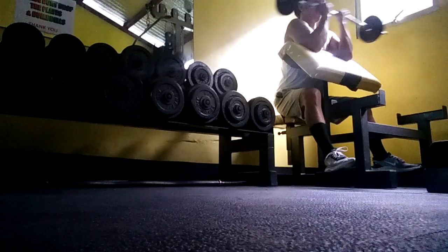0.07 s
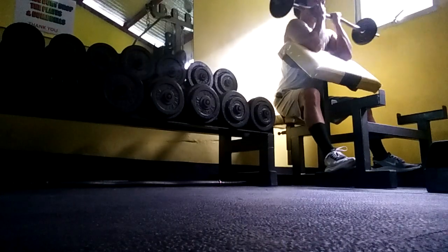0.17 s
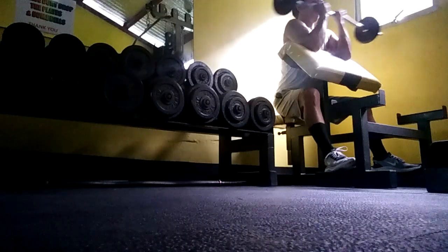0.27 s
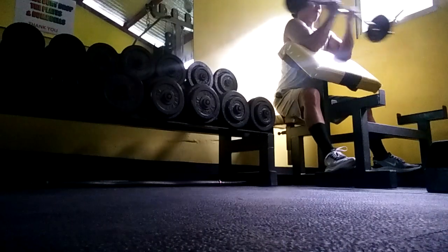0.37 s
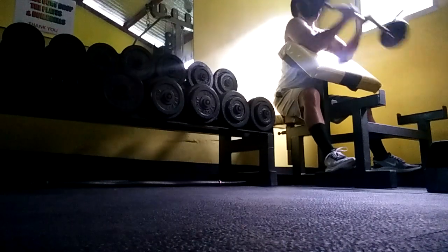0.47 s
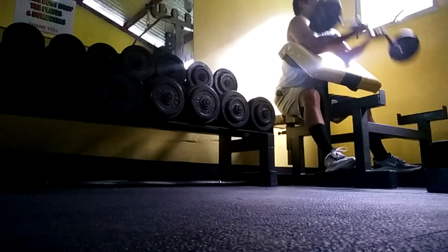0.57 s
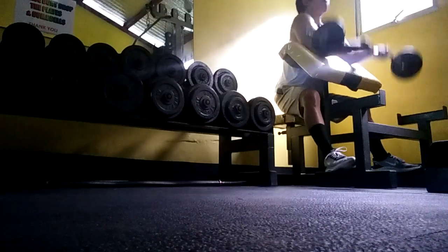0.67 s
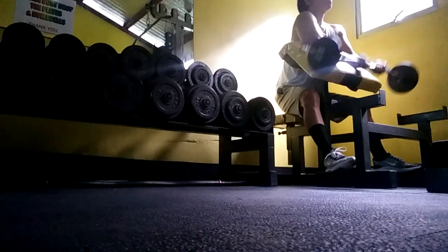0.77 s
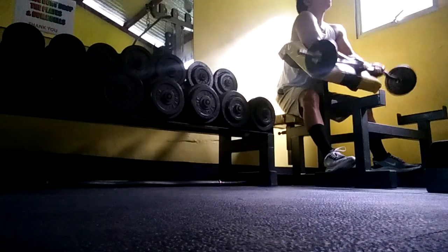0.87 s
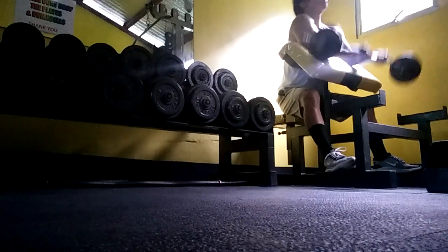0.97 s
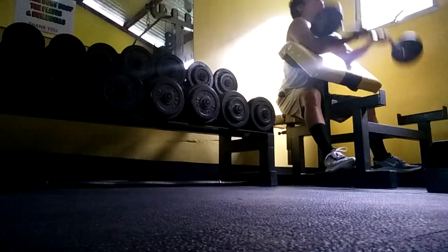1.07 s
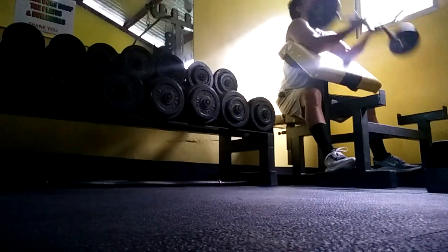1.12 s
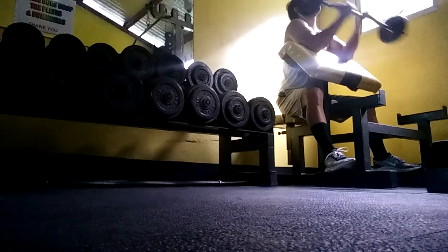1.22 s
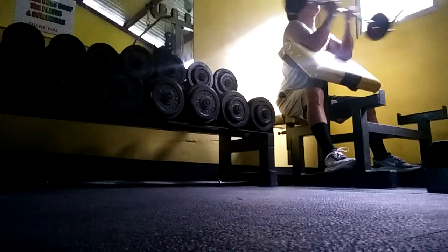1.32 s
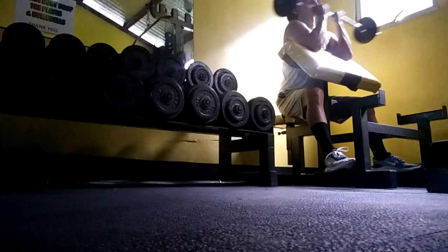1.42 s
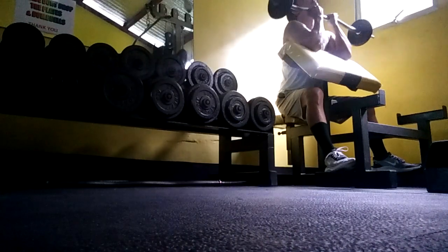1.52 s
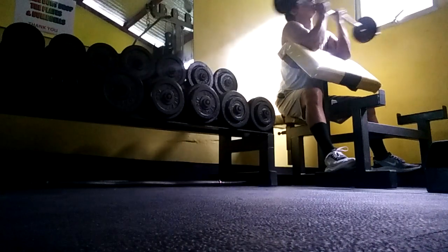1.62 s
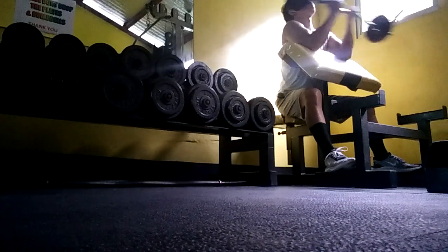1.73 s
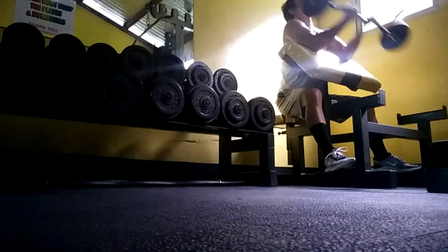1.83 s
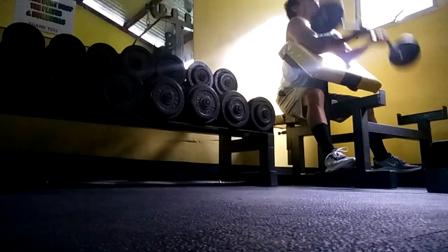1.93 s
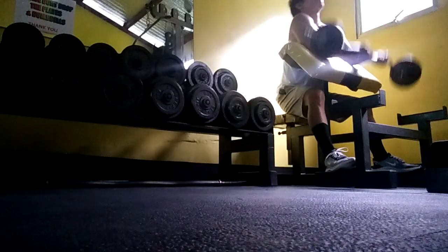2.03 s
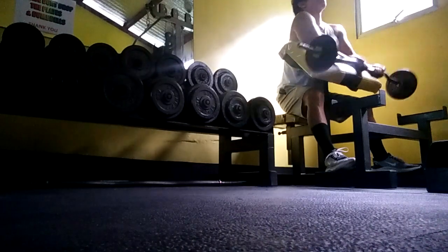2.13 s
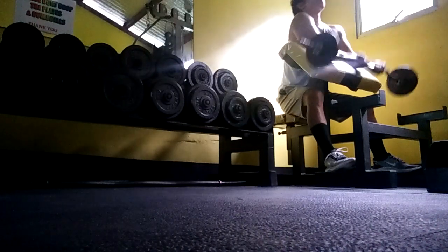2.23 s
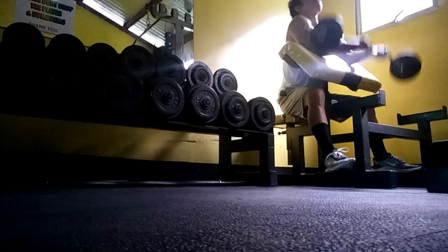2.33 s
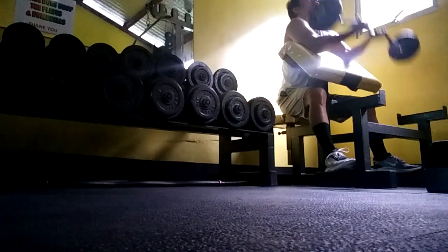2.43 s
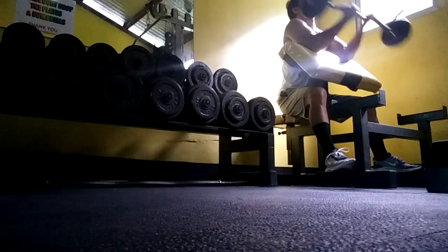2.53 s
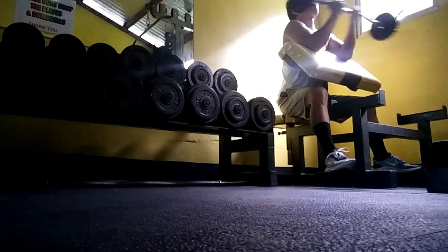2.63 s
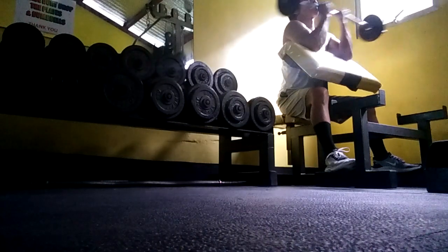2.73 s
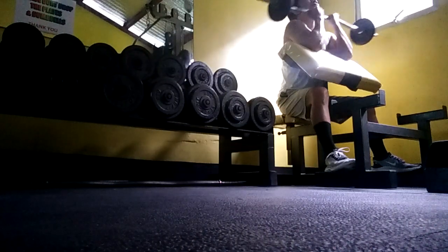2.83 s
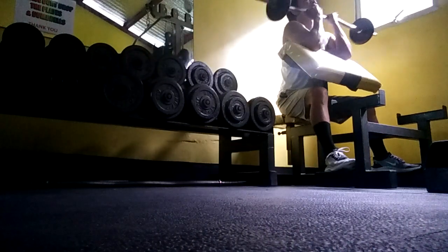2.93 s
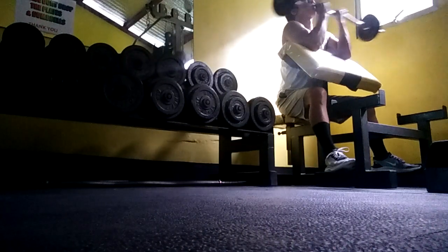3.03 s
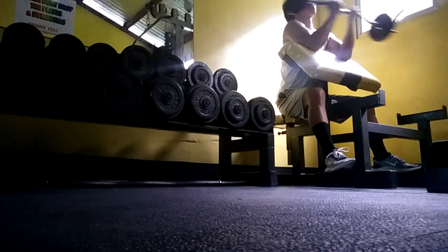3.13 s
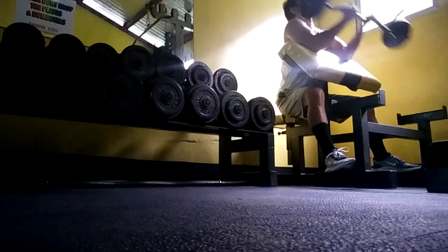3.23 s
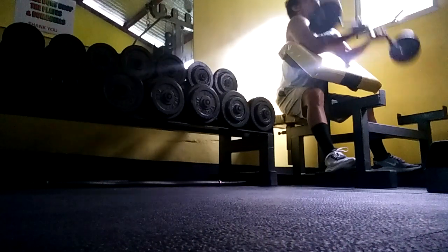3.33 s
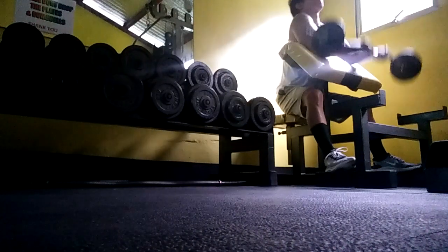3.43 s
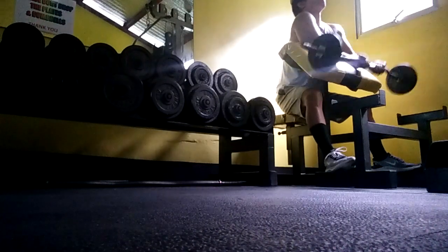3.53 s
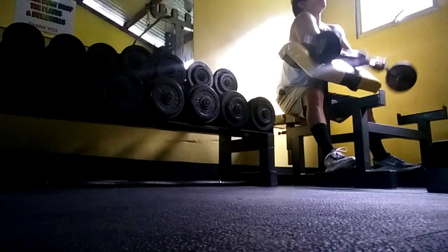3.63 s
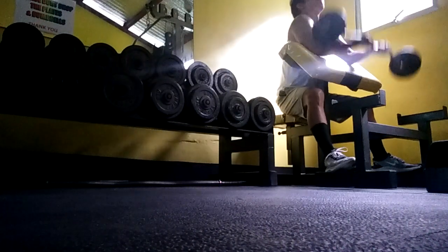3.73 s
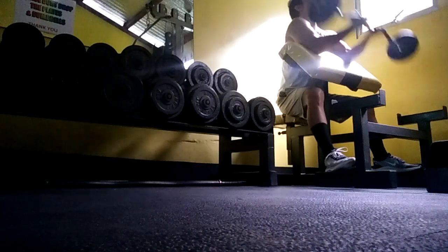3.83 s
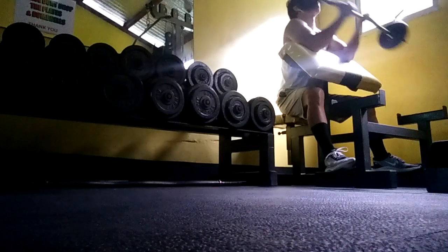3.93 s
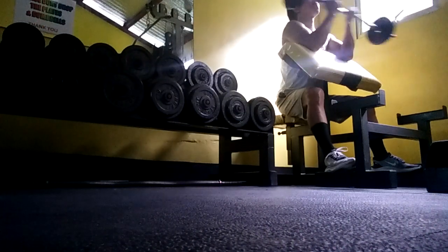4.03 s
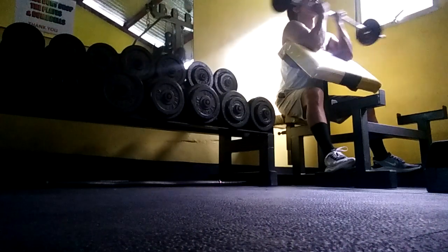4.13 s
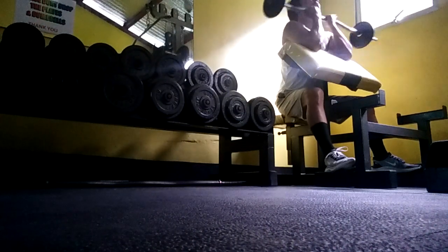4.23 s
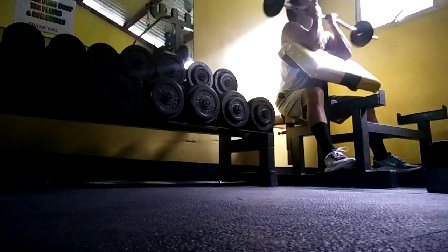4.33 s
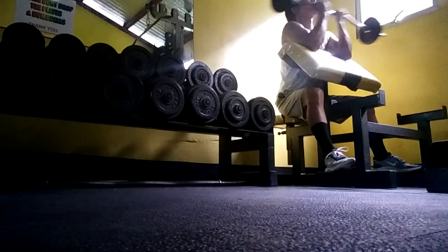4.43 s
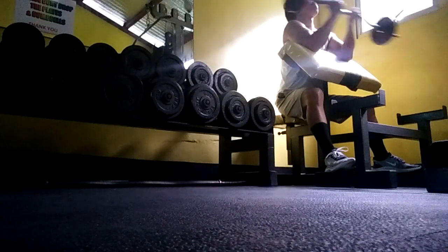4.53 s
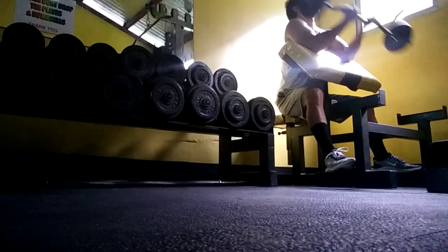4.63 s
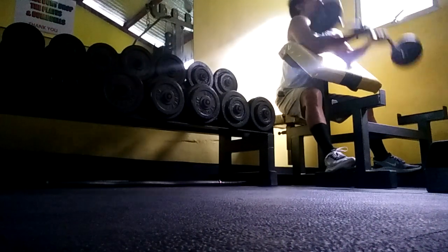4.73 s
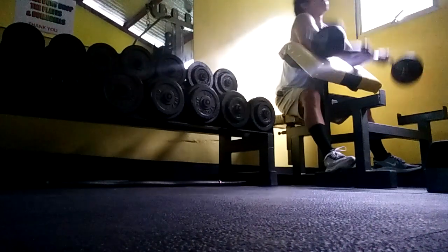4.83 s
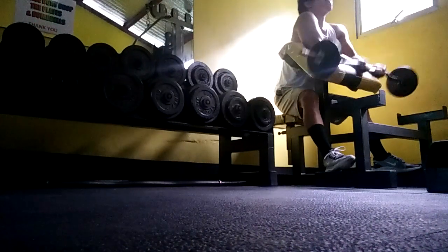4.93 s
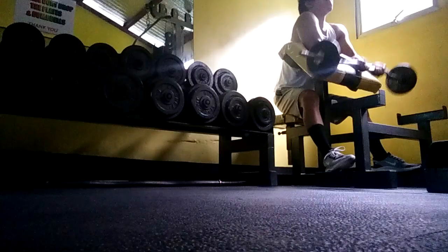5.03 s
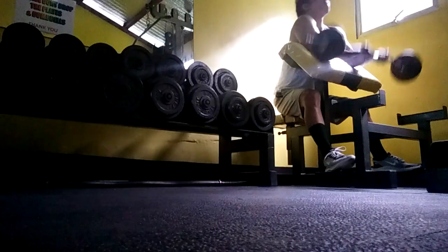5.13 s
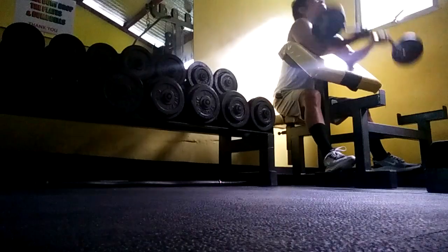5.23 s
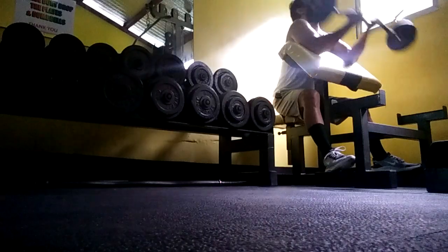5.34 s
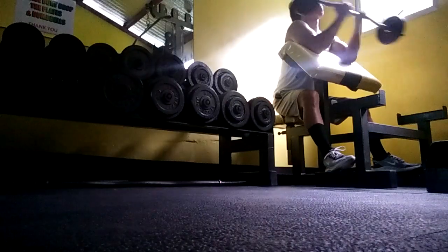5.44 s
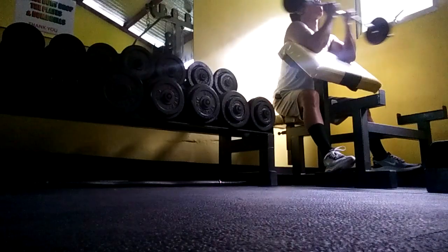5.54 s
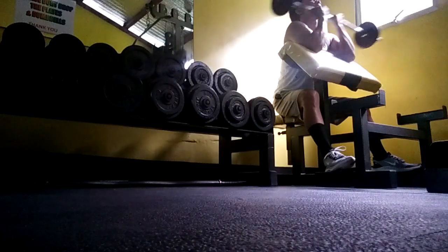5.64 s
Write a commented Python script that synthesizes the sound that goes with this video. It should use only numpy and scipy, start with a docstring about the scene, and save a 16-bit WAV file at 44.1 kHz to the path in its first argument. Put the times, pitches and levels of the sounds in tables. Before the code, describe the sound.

Loose iron weight plates squeal, flop softly and clank hard on a bar during four steady curls in a small reverberant gym.

```python
"""Low room rumble and the last trace of a singing plate, then scuffs, squeals and iron blows:
barbell curls in a small hard-walled gym, heard from the floor a few metres away.
Loose plates flop over as the bar comes down and clank together as it is pulled up: chatter plus modes.
Near the top of a curl they turn on the bar and squeal: stick-slip overtones and rasp.
Dull grainy noise swells twice; reverberation is decaying noise, rumble and air are shaped noise."""
import sys
import numpy as np
from scipy import signal
from scipy.fft import rfft, irfft
from scipy.io import wavfile
from scipy.ndimage import uniform_filter1d

SR = 44100
rng = np.random.default_rng(int(sys.argv[2]) if len(sys.argv) > 2 else 0)


def wrap_up_sound(samples):
    """Save the sound to the file named by the first command line argument, as 16-bit audio."""
    columns = np.atleast_2d(samples).T
    # keep every value between -1 and 1, then stretch to whole-number steps
    tamed = np.clip(columns, -1, 1)
    steps = np.round(tamed * 32767).astype(np.int16)
    wavfile.write(sys.argv[1], SR, steps)


N = 250929
TAPS = 8192
HZ = np.fft.rfftfreq(TAPS, 1 / SR)
T = np.arange(SR) / SR


def amp(db):
    """Amplitude ratio of a level in dB."""
    return 10 ** (np.asarray(db) / 20)


def evened(x):
    """Scales to unit RMS."""
    return x / np.sqrt(np.mean(x ** 2) + 1e-20)


def read(points, hz):
    """Interpolates a (frequency, value) curve over log frequency."""
    f, value = np.transpose(points)
    return np.interp(np.log(hz + 1), np.log(f + 1), value)


def add(mix, start_s, sound):
    """Adds a sound in place, trimmed to the mix."""
    start = round(start_s * SR)
    sound = sound[..., max(-start, 0):]
    part = mix[..., max(start, 0):][..., :sound.shape[-1]]
    part += sound[..., :part.shape[-1]]


def convolve(x, response):
    """Full convolution along time, channel by channel."""
    return signal.fftconvolve(np.atleast_2d(x), np.atleast_2d(response), axes=1)


def colour(x, gain_db):
    """Minimum-phase filter with gain_db at the frequencies HZ."""
    log_gain = np.log(amp(np.maximum(gain_db, -100)))
    circle = np.concatenate([log_gain, log_gain[-2:0:-1]])
    response = np.fft.ifft(np.exp(np.conj(signal.hilbert(circle)))).real
    return convolve(x, response)[:, :x.shape[-1]]


def drift(size, rate_hz):
    """Slow random wander of unit RMS."""
    hz = np.fft.rfftfreq(size, 1 / SR)
    spectrum = rfft(rng.standard_normal(size)) / (1 + (hz / rate_hz) ** 4)
    return evened(irfft(spectrum, size))


def envelope(t, length_s, attack_s, release_s):
    """Linear attack, hold and release."""
    return np.clip(t / attack_s, 0, 1) * np.clip((length_s - t) / release_s, 0, 1)


def at_level(sound, db):
    """Scales a blow so that the mid of its first 50 ms has this RMS level."""
    return amp(db) * sound / np.sqrt(np.mean(sound[0, :SR // 20] ** 2))


# reverberation: (frequency [Hz], t60 [s])
ROOM_T60 = [(100, 0.37), (300, .62), (700, 0.71), (1600, 0.61), (3000, 0.42), (6000, 0.56), (9000, 0.56),
            (14000, 0.8)]


def room(direct_db, build_s=0.00063):
    """Mid and side response, drawn anew per call: direct sound, then thickening reflections."""
    density = np.clip(.03 + T * 4, 0, 1)
    taps = rng.standard_normal((2, SR)) * (rng.random((2, SR)) < density) / np.sqrt(density)
    hz, t, z = signal.stft(taps, SR, nperseg=256)
    decay = amp(-60 * t / read(ROOM_T60, hz)[:, None])
    tail = signal.istft(z * decay, SR, nperseg=256)[1][:, :SR]
    tail *= 1 - np.exp(-T / build_s)
    tail /= np.linalg.norm(tail[0])
    tail[:, 0] += amp(direct_db)  # relative to the tail energy
    return tail / np.linalg.norm(tail[0])


# modes of the loaded bar: (frequency [Hz], level [dB], t60 [s])
IRON_MODES = [(318, -15, .56), (469, -8, .45), (576, 0, .5), (628, -6, .4), (743, -7, .53), (824, -6, .5),
              (898, -7, .5), (1013, -5, 1.05), (1110, -10, .55), (1226, -12, .5), (1522, -6, .7),
              (1553, 0, .66), (1640, -6, .55), (1712, -12, .6), (1791, -8, .52), (1907, -15, .55),
              (2236, -15, .5), (2396, -15, .55), (2455, -15, .6), (2606, -14, .55), (2900, -15, .45),
              (3480, -12, .4), (3690, -18, .37), (4947, -24, .45), (5850, -23, .48), (6148, -23, .45),
              (7400, -25, .42), (9150, -26, .4)]


def ringing(swell_s=0.0036, split_hz=12, twin=0.67):
    """Free ringing of the iron: the two ends of the bar give each mode a slightly detuned twin."""
    ring = np.zeros((2, SR))
    for hz, mode_db, t60_s in IRON_MODES:
        phase, twin_phase, detune = rng.random((3, 2, 1))
        twin_hz = hz + split_hz * (2 * detune - 1)
        main_tone = np.sin(2 * np.pi * (hz * T + phase))
        twin_tone = np.sin(2 * np.pi * (twin_hz * T + twin_phase))
        ring += amp(mode_db - 60 * T / t60_s) * (main_tone + twin * twin_tone)
    return ring * (1 - np.exp(-T / swell_s))


# dense, short clack of a contact: (frequency [Hz], density [dB per Hz])
CLACK_TONE = [(60, -25), (150, -19), (310, -10.5), (372, -18), (430, -2), (750, -3.5), (1100, -2.5),
              (1350, -9.5), (1600, 1), (2000, -7.5), (3500, -9), (4300, -18.5), (5800, -17), (9400, -19),
              (10300, -28), (14000, -37.5)]


def contact(db, corner_hz, ring_db, chatter_s=0.0057, chatter=0.21, slope_db=13):
    """Iron meets iron: the faces chatter for an instant, then the plates ring."""
    hits = rng.standard_normal(SR) * (rng.random(SR) < 1500 / SR)  # 1500 per s
    force = chatter * hits * np.exp(-T / chatter_s)
    force[0] = 1
    clack = colour(convolve(force, room(direct_db=-28.0))[:, :SR], read(CLACK_TONE, HZ))
    # a softer contact lasts longer and so carries less treble
    softness_db = -slope_db * np.log10(1 + (HZ / corner_hz) ** 2)
    blow = at_level(clack, 0) + at_level(ringing(), ring_db)
    return at_level(colour(blow, softness_db), db)


# rumble of the room: (time [s], level [dB])
RUMBLE_LEVEL = [(0.0, -62), (0.28, -60), (0.46, -71.5), (1.17, -56), (1.35, -64.5), (2.47, -55.5),
                (2.52, -60.5), (3.0, -67), (3.26, -63.5), (3.42, -77), (3.5, -66.5), (4.6, -54.5),
                (4.82, -66.5), (5.44, -61.5), (5.59, -71), (5.69, -64)]
# rumble spectrum: (frequency [Hz], density [dB per Hz])
RUMBLE_SPECTRUM = [(25, -23), (45, -14.5), (62, -1), (80, -5), (118, 1.5), (160, -7.5), (220, -22),
                   (350, -19), (800, -79)]
# air spectrum: (frequency [Hz], density [dB per Hz])
AIR_SPECTRUM = [(100, -14), (250, -5), (310, -1), (372, -6.5), (450, 0), (800, 1), (1200, -8), (1700, -7.5),
                (3000, -20), (5000, -25), (8000, -28), (14000, -29)]


def background(air_db=-61, follow=.2, usual_db=-63, swell_db=1.1):
    """Low rumble noise, and the air of the room that swells a little with it and wavers."""
    rumble_db = np.interp(np.arange(N) / SR, *np.transpose(RUMBLE_LEVEL))
    rumble = evened(colour(rng.standard_normal((2, N)), read(RUMBLE_SPECTRUM, HZ)))
    air = evened(colour(rng.standard_normal((2, N)), read(AIR_SPECTRUM, HZ)))
    air_level_db = air_db + follow * (rumble_db - usual_db) + swell_db * drift(N, rate_hz=4)
    return rumble * amp(rumble_db) + air * amp(air_level_db)


# a plate singing as it rubs round the sleeve: (time [s], length [s], pitch [Hz], level [dB])
SING_EVENTS = [(-.04, 0.069, 1022, -56.5), (4.171, 0.12, 1010, -48.5), (4.235, 0.12, 1009, -54)]


def sings(waver=0.007, third_db=-38):
    """Gentle rubbing swells one plate mode, with a faint third harmonic."""
    out = np.zeros((2, N))
    for start_s, length_s, hz, db in SING_EVENTS:
        size = int(length_s * SR)
        angle = 2 * np.pi * np.cumsum(hz * (1 + waver * drift(size, rate_hz=50))) / SR
        wave = np.sin(angle) + amp(third_db) * np.sin(3 * angle)
        tone = evened(wave * np.hanning(size))
        heard = convolve(tone, room(direct_db=1.0))
        add(out, start_s, amp(db) * heard * np.linalg.norm(tone) / np.linalg.norm(heard[0]))
    return out


# touches and slips of plates and collars:
# (time [s], level [dB], centre [Hz], -6 dB width [Hz], length, twice the decay constant [s])
TOUCH_EVENTS = [(.246, -54.5, 810, 397, 0.013), (1.051, -54, 910, 230, 0.0018),
                (1.994, -51, 765, 600, 0.022), (2.346, -64, 2450, 1500, 0.015),
                (3.376, -74, 3010, 123, 0.13), (3.434, -59.5, 820, 150, 0.077),
                (4.329, -65, 9500, 6860, 0.035)]


def touches():
    """Brief scuffs that excite only one region of the metal."""
    out = np.zeros((2, N))
    for start_s, db, centre_hz, width_hz, length_s in TOUCH_EVENTS:
        scuff = rng.standard_normal(SR) * np.exp(-2 * T / length_s)
        scuff = colour(scuff, -20 * np.log10(1 + (2 * (HZ - centre_hz) / width_hz) ** 2))
        add(out, start_s, at_level(convolve(scuff, room(direct_db=-5.5)), db))
    return out


# stick-slip squeals: (time [s], length [s], pitch [Hz], level [dB],
# peak harshness of rasp, overtones and in-between line [dB], fading [dB per s], judder [0-1])
SQUEAL_EVENTS = [(.272, .135, 1641, -41, -22, 66, .35), (.41, .06, 1634, -58, -26, 60, .1),
                 (1.598, .215, 1649, -39.5, -4, 8, .08), (1.83, .11, 1638, -51, -13, 5, .05)]
# squeal overtones: (multiple of pitch, level [dB], gain over reference harshness [dB per dB])
SQUEAL_OVERTONES = [(1, 1, 0), (2, -8, .35), (3, -13.5, .42), (4, -37, .3), (5, -33.5, .7), (6, -33, .2)]
# rasp of dry iron within a squeal: (frequency [Hz], density [dB per Hz])
RASP_TONE = [(500, -39.5), (1500, -4.5), (1800, 6.5), (2400, 2.5), (2800, -9), (3300, -4), (4200, -1.5),
             (4600, -9), (5700, -6.5), (7400, -14), (8300, -7), (10000, -18), (12000, -23)]
GRIP_S, LET_GO_S = 0.024, 0.042  # attack, release
BITE_HZ, BITE_S = 40, .012  # initial sharpness, its decay constant
HARSH_AT, HARSH_FALL_DB = 0.34, 29  # harshest at this share of the length; drop at the ends
JUDDER_HZ, JUDDER_RAD = 41.65, 1.14  # the plate shudders on the bar: level throbs, pitch sways


def squeals(waver_rad=.2, grit_db=-28, harsh_grit_db=-11, ring_db=-14, reference_db=-4):
    """Stick-slip of a plate on the bar; pressed hard, it rasps and a line appears between the overtones."""
    out = np.zeros((2, N))
    for start_s, length_s, pitch_hz, top_db, harshest_db, fade_db_per_s, judder in SQUEAL_EVENTS:
        t = np.arange(0, length_s, 1 / SR)
        hz = pitch_hz + BITE_HZ * np.exp(-t / BITE_S)
        shudder = judder * np.cos(2 * np.pi * JUDDER_HZ * t)
        level = amp(top_db - fade_db_per_s * t) * envelope(t, length_s, GRIP_S, LET_GO_S)
        level = level * (1 + .5 * shudder)

        pressure = np.sin(np.pi / 2 * np.interp(t / length_s, [0, HARSH_AT, 1], [0, 1, 0]))
        harsh_db = harshest_db - HARSH_FALL_DB * (1 - pressure)

        angle = 2 * np.pi * np.cumsum(hz) / SR + JUDDER_RAD * shudder
        angle = angle + waver_rad * drift(len(t), rate_hz=98)
        tone = np.zeros(len(t))
        for multiple, line_db, growth in SQUEAL_OVERTONES:
            line_gain = amp(line_db + growth * (harshest_db - reference_db))
            tone += line_gain * np.sin(multiple * angle)
        # in-between line at 1.5 times the pitch
        tone += amp(harsh_db) * np.sin(3 * angle / 2 + .6 * drift(len(t), rate_hz=90))
        tone = evened(tone * (1 + .3 * drift(len(t), rate_hz=50)))  # the grip comes and goes

        grit = evened(colour(rng.standard_normal(len(t)), read(RASP_TONE, HZ)))
        rasp = (amp(grit_db) + amp(harsh_db + harsh_grit_db)) * grit
        heard = convolve(level * (tone + rasp), room(direct_db=4.5))
        ring = convolve(level * grit, ringing())  # the rasp wakes the neighbouring modes
        for layer, share_db in (heard, 0), (ring, ring_db):
            gain = amp(share_db) * np.linalg.norm(level) / np.linalg.norm(layer[0])
            add(out, start_s, gain * layer)
    return out


# soft iron contacts: plates flopping over, and one soft knock just before the last clank:
# (time [s], level [dB], brightness corner [Hz],
# time between contacts [s], second contact over the first [dB])
SOFT_EVENTS = [(.772, -40, 1350, 0.017, -3), (2.123, -39.5, 1360, .027, -3.5),
               (3.529, -37.5, 1960, .021, -9.5), (4.989, -41.5, 1750, .018, 5),
               (5.196, -48.5, 515, 0.016, -8)]
SETTLE_DB, DULLING = -3.5, 0.57  # third contact over the first; corner ratio per contact


def soft_contacts(ring_db=-1.5):
    """Flops and a soft knock: three close iron contacts each, every one duller than the one before."""
    out = np.zeros((2, N))
    for start_s, db, corner_hz, gap_s, second_db in SOFT_EVENTS:
        for k, share_db in enumerate([0, second_db, SETTLE_DB]):
            touch = contact(db + share_db, corner_hz * DULLING ** k, ring_db)
            add(out, start_s + k * gap_s, touch)
    return out


# plates slamming together: (time [s], level [dB], brightness corner [Hz], thud gain [dB])
CLANK_EVENTS = [(1.122, -28.5, 10340, -15), (2.392, -28.5, 8650, -15.5), (3.816, -30.5, 14400, -17.5),
                (5.267, -29, 19800, -14.5)]
# first touch, blow and rebound within one clank: (delay [s], thud share [dB])
SEATING_THUDS = [(-.006, -7.5), (.0005, -1), (.007, -3)]


def clanks(thud_hz=650, thud_s=0.0025, crack_db=-20.5, crack_s=0.0055, growth=4):
    """Hard blows: the plate seats on the sleeve with a few thuds, the harder ones with a bright crack."""
    out = np.zeros((2, N))
    thud = np.sin(2 * np.pi * thud_hz * T) * np.exp(-T / thud_s) * (1 - np.exp(-T / 0.001))
    bright_db = read(CLACK_TONE, HZ) - 10 * np.log10(1 + (4500 / (HZ + 1)) ** 2)
    for start_s, db, corner_hz, thud_db in CLANK_EVENTS:
        add(out, start_s, contact(db, corner_hz, ring_db=-1.5))
        for delay_s, share_db in SEATING_THUDS:
            noise = evened(colour(rng.standard_normal((2, TAPS)), bright_db))
            crack = noise * np.exp(-T[:TAPS] / crack_s)
            # a light touch has hardly any crack
            crack_gain = amp(thud_db + crack_db + growth * min(share_db, 0))
            add(out[0], start_s + delay_s, amp(thud_db + share_db) * thud)  # mid only
            add(out, start_s + delay_s, crack_gain * crack)
    return out


# dull grainy swells of low and mid noise: (time [s], length [s], level [dB])
SWELL_EVENTS = [(2.04, 0.8, -52), (3.98, 0.866, -55)]
# swell spectrum: (frequency [Hz], density [dB per Hz])
SWELL_SPECTRUM = [(100, -4), (280, 6), (372, -7), (450, 0), (850, -1), (1200, -3), (1550, -0.5), (2150, -2),
                  (2800, -22), (5000, -35.5), (12000, -30)]


def grainy_swells(grains_per_s=500, corner_hz=2300, resonant_db=-7, rise_s=0.1, fall_s=0.15):
    """Dull grainy swell, perhaps traffic outside: random impulses, reverberated and through resonances."""
    out = np.zeros((2, N))
    for start_s, length_s, db in SWELL_EVENTS:
        t = np.arange(0, length_s, 1 / SR)
        grains = rng.standard_normal(len(t)) * (rng.random(len(t)) < grains_per_s / SR)
        noise = convolve(grains, room(direct_db=-0.5))[:, :len(t)]
        noise = colour(noise, read(SWELL_SPECTRUM, HZ))
        resonant = convolve(grains, ringing())[:, :len(t)]  # same mode bank as the iron
        resonant = colour(resonant, -10 * np.log10(1 + (HZ / corner_hz) ** 4))
        sound = evened(evened(noise) + amp(resonant_db) * evened(resonant))
        add(out, start_s, sound * amp(db) * envelope(t, length_s, rise_s, fall_s))
    return out


# stereo width: (frequency [Hz], side filter gain [dB])
SIDE_GAIN = [(3500, -69), (5000, -33), (7000, -7), (14000, -6.5)]


def scene():
    """Sums all sources; left and right are alike below about 5 kHz and differ in the treble."""
    mid, side = (background() + sings() + touches() + squeals()
                 + soft_contacts() + clanks() + grainy_swells())
    side = colour(side, read(SIDE_GAIN, HZ))[0]
    return np.array([mid + side, mid - side])


def record(dry, depth_db=8.0, open_db=13, knee_db=8, link_db=13, low_cut_hz=45, edge_hz=14400):
    """A noise suppressor lowers bands near their own floor, loud sound opens all; then band limits."""
    hz, t, z = signal.stft(dry, SR, nperseg=512, noverlap=384)
    power = (abs(z) ** 2).mean(0)
    for axis in 0, 1:
        power = uniform_filter1d(power, size=9, axis=axis)
    power = abs(power) + 1e-20
    level_db, total_db = 10 * np.log10(power), 10 * np.log10(power.sum(0))
    # floor: 10th percentile over time
    band_over_db = level_db - np.percentile(level_db, 10, axis=1, keepdims=True)
    total_over_db = total_db - np.percentile(total_db, 10)
    over_db = np.maximum(band_over_db, total_over_db - link_db)
    shut = np.clip((open_db - over_db) / knee_db, 0, 1)
    shut = shut * np.clip(hz / 400, 0, 1)[:, None]  # acts less below 400 Hz
    quiet = signal.istft(z * amp(-depth_db * shut), SR, nperseg=512, noverlap=384)[1][:, :N]
    quiet = signal.sosfilt(signal.butter(2, low_cut_hz, "high", fs=SR, output="sos"), quiet)
    low_pass = signal.firwin(511, edge_hz, window=("kaiser", 9), fs=SR)
    return signal.oaconvolve(quiet, low_pass[None], "same")


dry = scene()
out = record(dry)
wrap_up_sound(out)
```